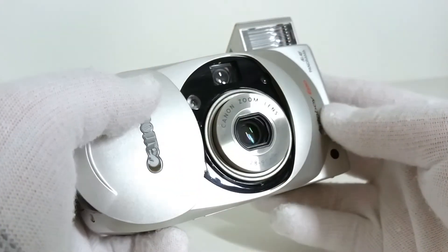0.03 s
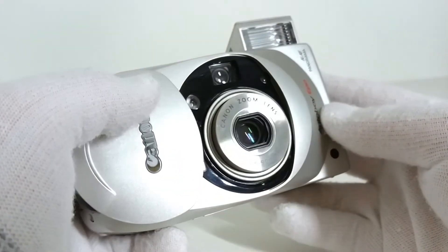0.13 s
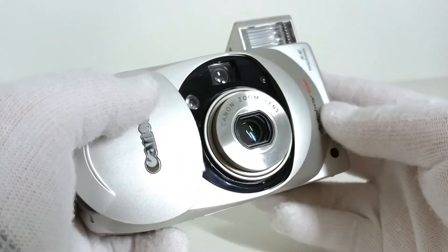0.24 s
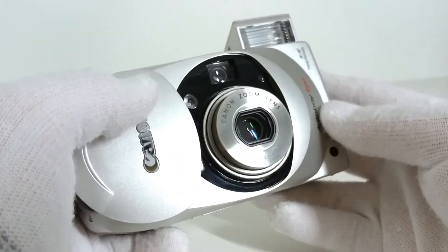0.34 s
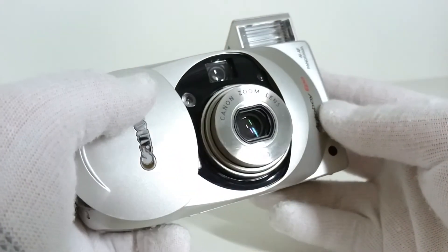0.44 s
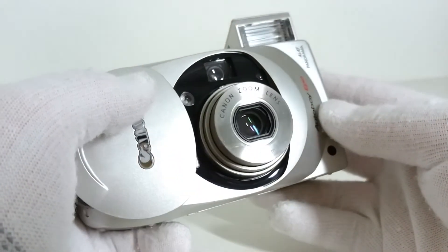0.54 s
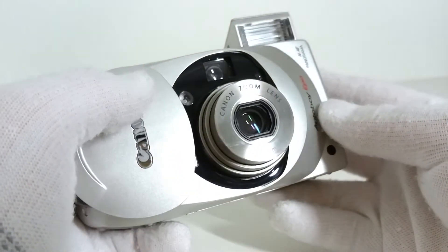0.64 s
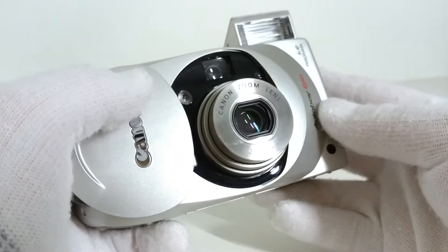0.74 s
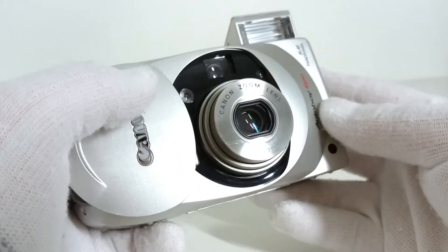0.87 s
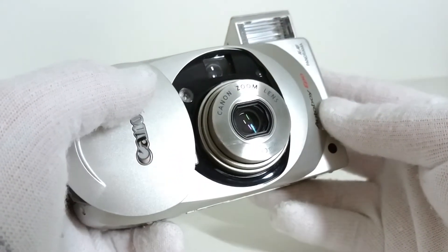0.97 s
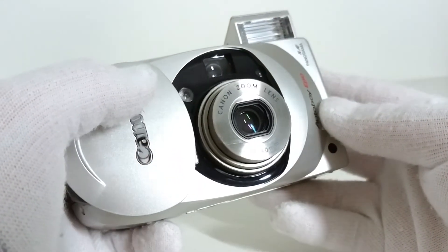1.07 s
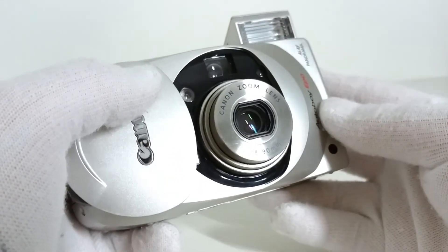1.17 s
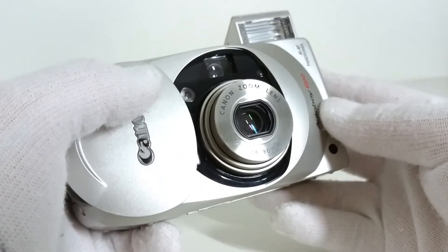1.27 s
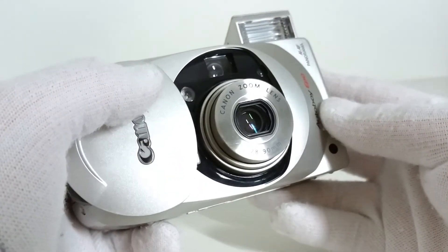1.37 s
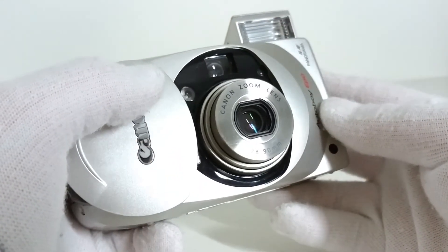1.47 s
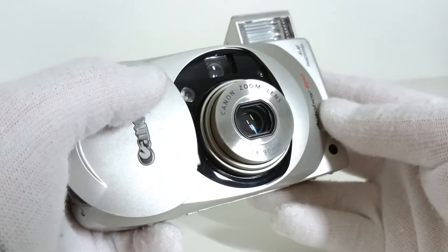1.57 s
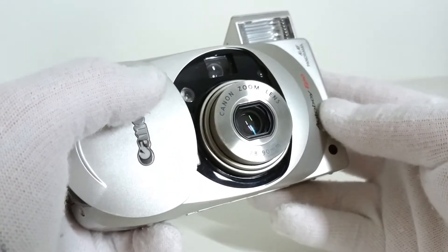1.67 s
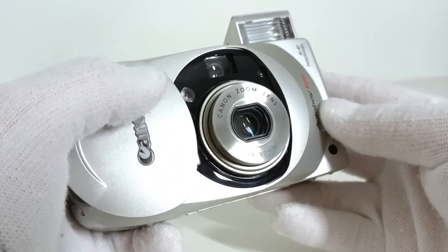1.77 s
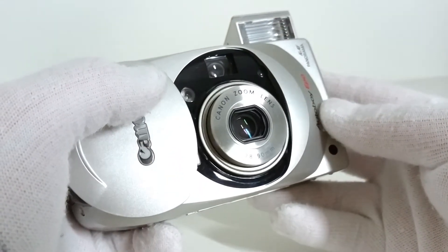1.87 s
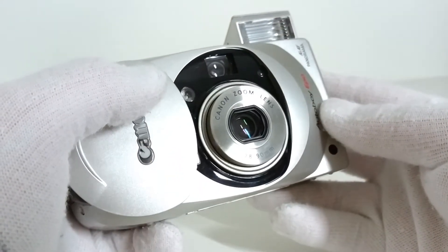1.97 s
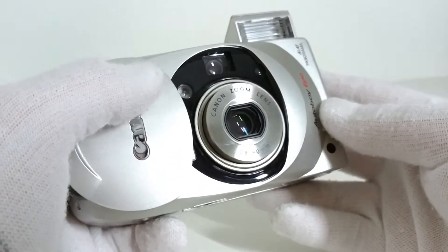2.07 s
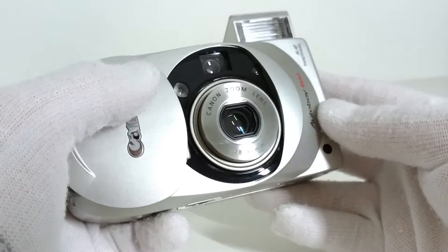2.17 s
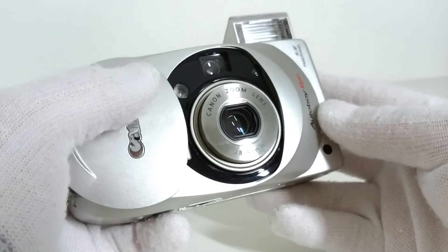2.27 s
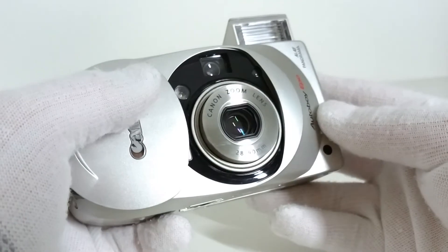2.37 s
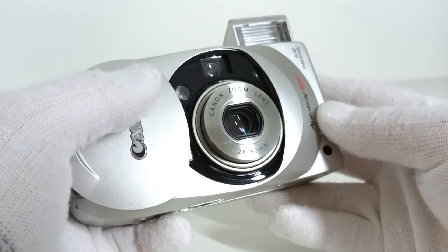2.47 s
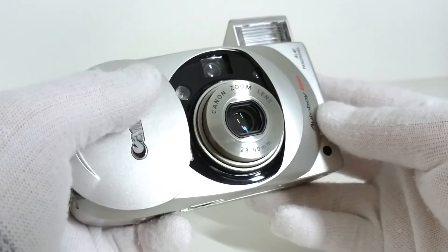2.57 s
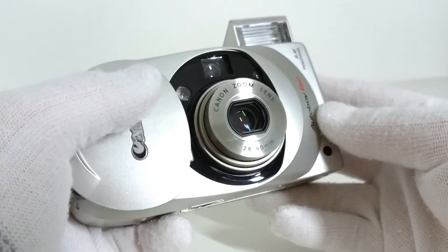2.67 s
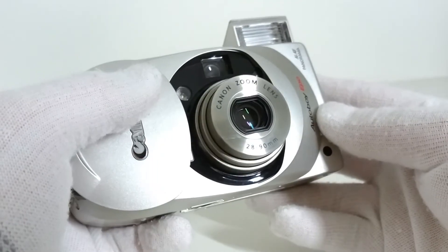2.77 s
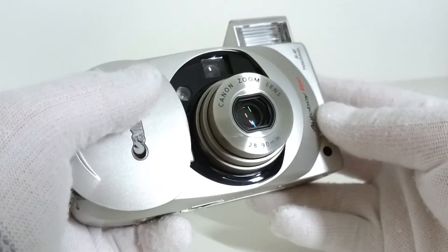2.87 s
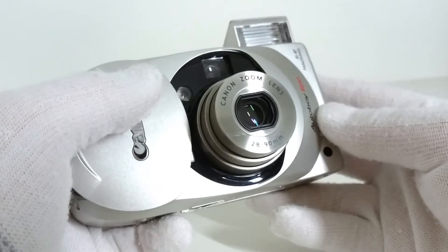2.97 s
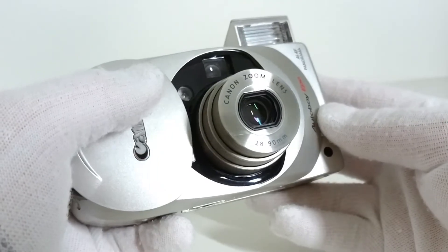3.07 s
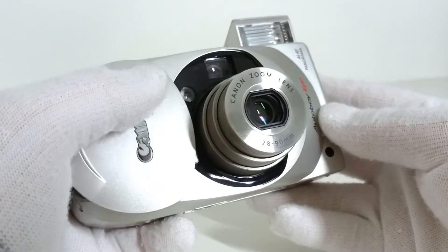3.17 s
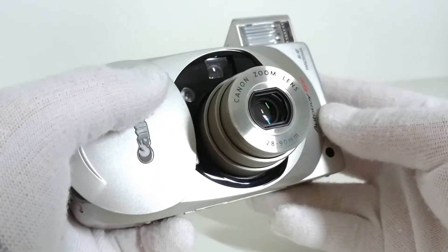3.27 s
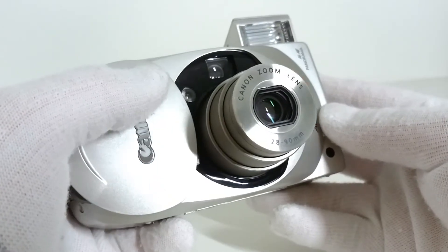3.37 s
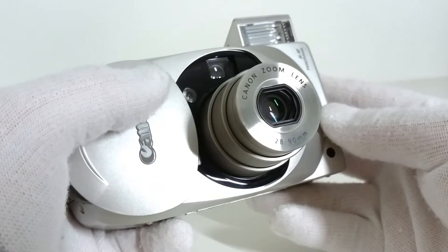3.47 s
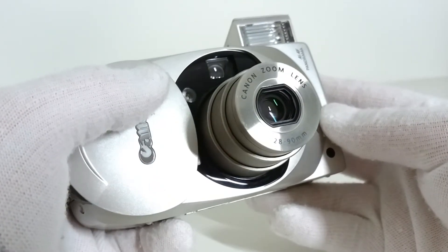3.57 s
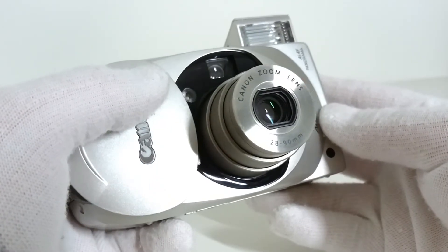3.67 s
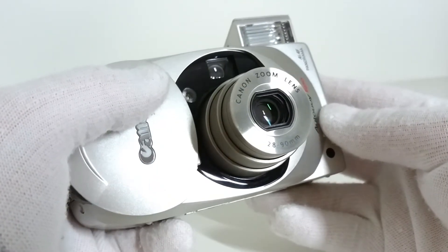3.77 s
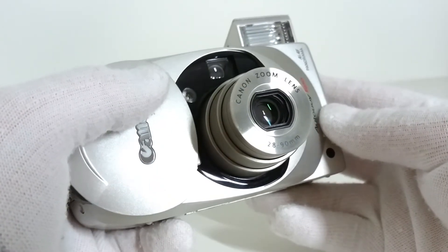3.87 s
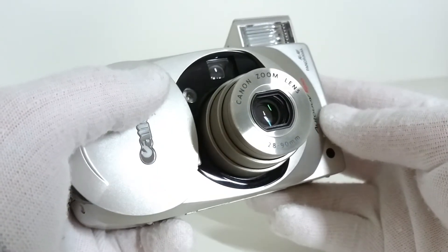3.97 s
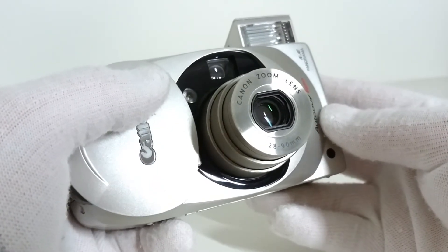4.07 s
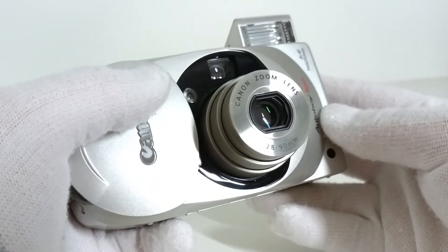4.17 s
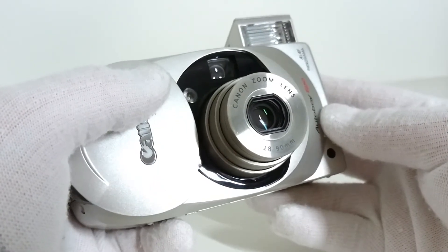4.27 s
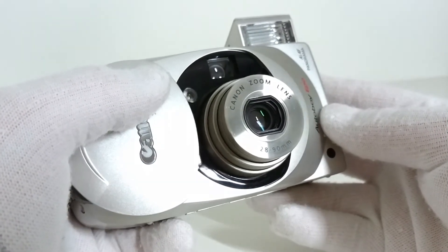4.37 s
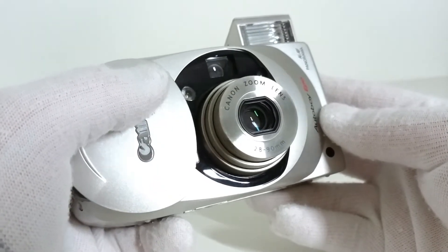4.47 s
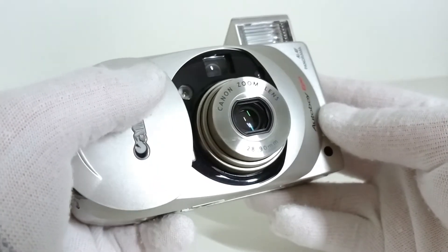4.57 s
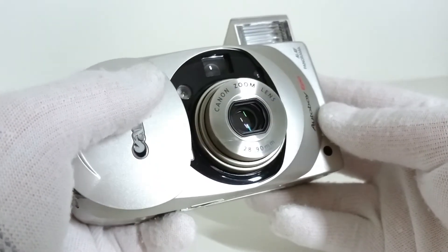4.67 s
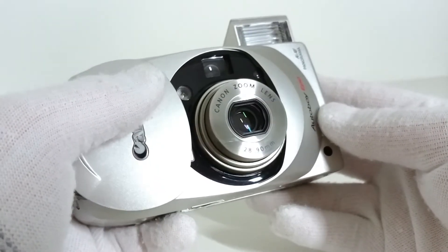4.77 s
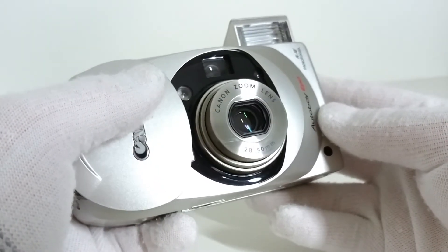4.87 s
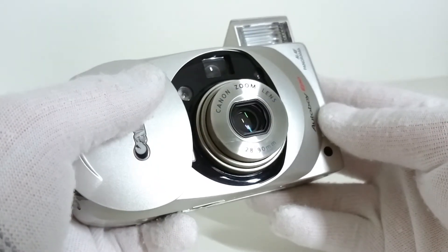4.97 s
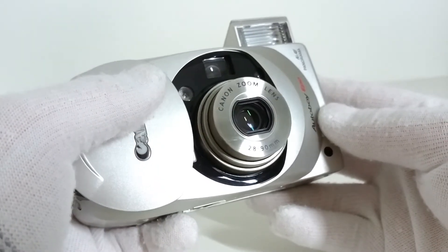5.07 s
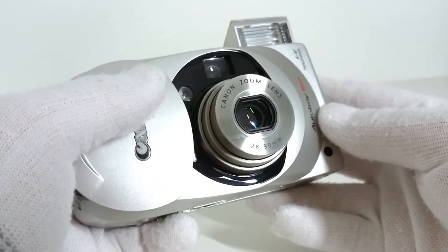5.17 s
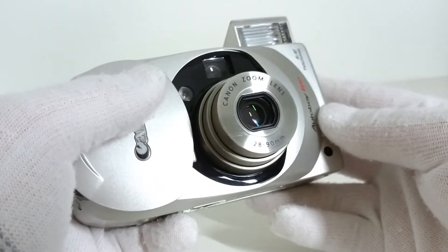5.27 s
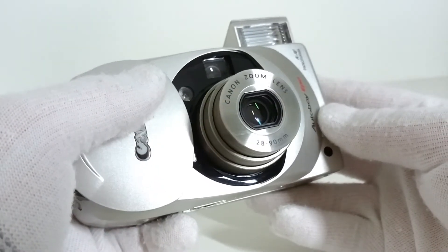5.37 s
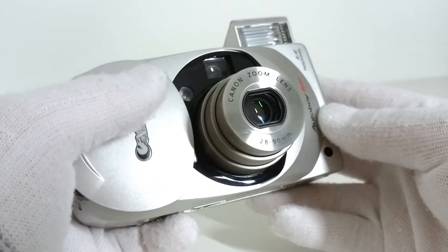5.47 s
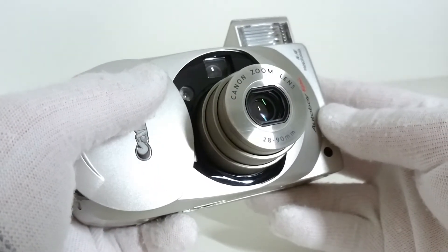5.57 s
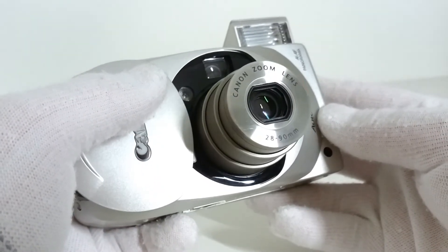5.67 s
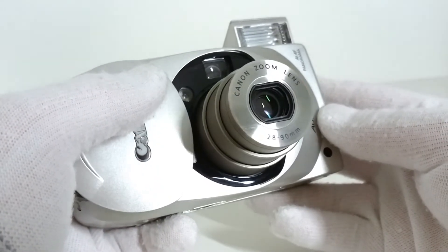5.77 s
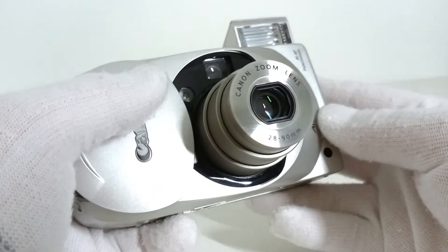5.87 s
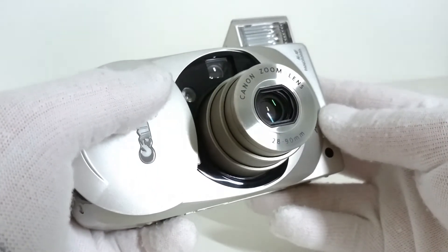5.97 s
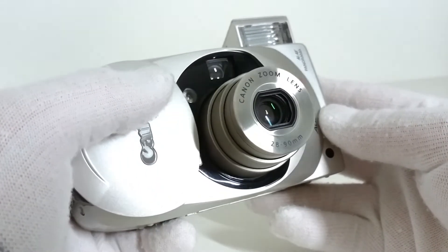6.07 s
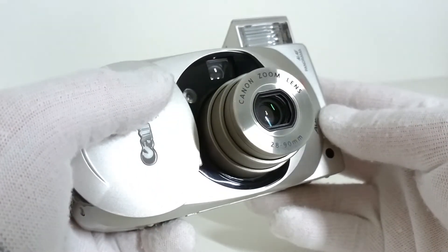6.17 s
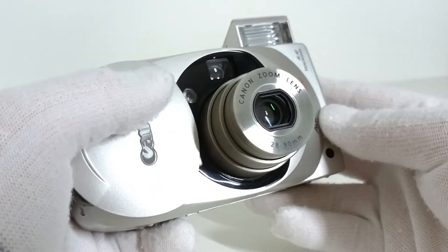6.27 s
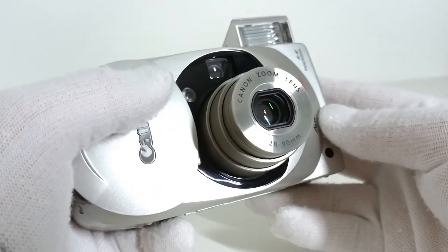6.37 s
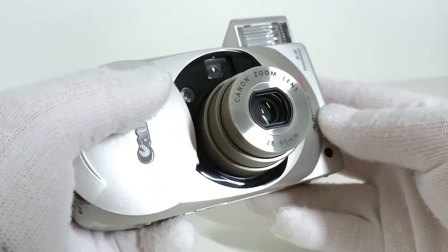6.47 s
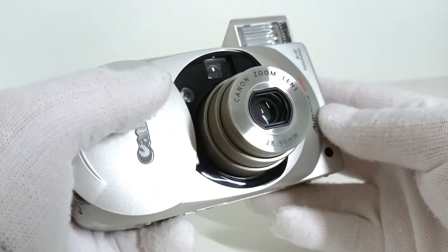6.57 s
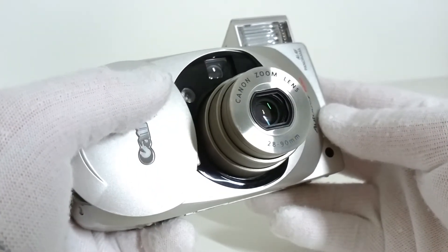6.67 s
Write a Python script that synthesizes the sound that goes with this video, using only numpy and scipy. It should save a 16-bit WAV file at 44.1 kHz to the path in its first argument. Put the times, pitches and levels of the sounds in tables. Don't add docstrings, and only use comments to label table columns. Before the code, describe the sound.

Very close, mono, in a small quiet furnished room with low unsteady rumble and faint air. A soft glove thump opens. From 0.2 to 0.7 s a tiny motor whines over hollow plastic gear rattle, its pitch sagging slightly under load. A short grainier return runs 0.8 to 1.03, stops with a sharp jolt, and a brief gear nudge follows at 1.2. Another return at 1.64 to 1.96 jolts, then nudges at 2.1. A bright click at 2.34 leads into the longest extension, 2.4 to 3.5, dipping around 3.1 and then rising. Returns follow at 3.6 to 3.84, with a nudge at 3.97, and 4.13 to 4.72, each ending in a jolt. The loudest hollow click comes at 4.8, with a nudge just after. The last extension whirs 5.03 to 5.8; the last return, 5.9 to 6.14, slams shut. A final nudge at 6.27 and small click at 6.4 leave quiet room tone. Dull finger thumps recur throughout.

```python
import sys
import numpy as np
from scipy import signal
from scipy.fft import rfft, irfft
from scipy.io import wavfile
from scipy.ndimage import uniform_filter1d

SR = 44100
rng = np.random.default_rng(int(sys.argv[2]) if len(sys.argv) > 2 else 0)


def gain_from_db(level_db):
    decades = np.asarray(level_db, float) / 20
    return 10 ** decades


def output_pcm(signal):
    pcm = np.clip(np.atleast_2d(signal).T, -1, 1) * 32767
    wavfile.write(sys.argv[1], SR, np.round(pcm).astype(np.int16))


N = 296352

# (time [s], shaft speed [Hz])
LOADS_OUT = [
    [(0.199, 418), (0.355, 435), (0.4, 375.7), (0.485, 333.4), (0.68, 347), (0.709, 314)],
    [(2.407, 422), (2.568, 446.5), (2.671, 394.3), (2.814, 385), (2.896, 354), (3.103, 309), (3.104, 370.7),
     (3.269, 375.2), (3.519, 422)],
    [(5.039, 427.4), (5.251, 425.3), (5.37, 390), (5.475, 378.4), (5.53, 394.5), (5.605, 388.6),
     (5.809, 432.3)],
]
# (time [s], shaft speed [Hz])
LOADS_BACK = [
    [(0.797, 391), (1.037, 450)],
    [(1.629, 382.6), (1.793, 432), (1.965, 443.5)],
    [(3.603, 439), (3.843, 442)],
    [(4.133, 399.7), (4.311, 415.8), (4.365, 437), (4.49, 427.4), (4.725, 432.5)],
    [(5.9, 424.9), (6.139, 447.5)],
]
# (sound start [s], switch-off [s], rattle level [dB])
POWER_OUT = [
    (0.195, 0.713, -44.5),
    (2.4, 3.515, -44),
    (5.031, 5.81, -44),
]
# (sound start [s], switch-off [s], rattle level [dB])
POWER_BACK = [
    (0.819, 1.025, -45.5),
    (1.639, 1.958, -46),
    (3.605, 3.834, -45.5),
    (4.132, 4.723, -46.5),
    (5.907, 6.132, -46),
]
# (multiple of shaft speed [-], level [dB])
ORDERS_OUT = [(1, -31.5), (2, -19), (3, 0), (4, -1), (5, -23), (6, -20.5), (7, -13), (8, -2.5), (9, -8.5),
              (10, -13.5), (11, -33), (12, -12.5), (13, -11.5), (14, -9.5), (15, -12.5), (16, -7.5),
              (17, -13), (18, -15), (19, -9)]
# (multiple of shaft speed [-], level [dB])
ORDERS_BACK = [(1, -9), (2, -7), (3, -5), (4, -17.5), (5, 6.5), (6, 0), (7, 0), (8, -2.5), (9, 1.5),
               (10, 4), (11, -1.5), (12, -1), (13, -1), (14, 5), (15, 0.5), (16, -31), (17, -37),
               (18, -24.5), (19, -0.5)]
# (multiple of shaft speed [-], level [dB])
PINION_OVERTONES = [(27, -13.5), (36, -18)]
# (multiple [-], base level [dB], resonance [Hz], width [Hz], level on it [dB])
MOUNT_OUT = [(2, -69, 790, 45, -61), (3, -47.5, 1200, 55, -44.5), (4, -66, 1550, 180, -46),
             (8, -58, 3130, 150, -46), (9, -58, 3160, 190, -42), (9, -75, 3800, 150, -52),
             (10, -60, 3370, 180, -43), (12, -62, 5020, 150, -53), (16, -63, 6250, 300, -54),
             (18, -65, 6300, 250, -52), (27, -70, 9500, 1000, -59), (36, -76, 12100, 700, -67)]
# (multiple [-], base level [dB], resonance [Hz], width [Hz], level on it [dB])
MOUNT_BACK = [(3, -54, 1165, 50, -68), (5, -69, 2170, 90, -53), (7, -63, 3020, 120, -57),
              (9, -65, 3150, 200, -54)]
# (frequency [Hz], density [dB per Hz])
GEARS_OUT = [(240, -65), (400, -20), (921, -8.5), (1070, -20), (1230, -18), (1400, -14.5), (1650, -10.5),
             (2150, -14.5), (3070, -1.5), (3870, -6), (4730, -7), (6540, -6), (12300, -27.5), (15000, -15),
             (15800, -24)]
# (frequency [Hz], density [dB per Hz])
GEARS_BACK = [(240, -57), (400, -15.5), (1070, -8), (1230, -5), (1350, -6), (1580, 0.5), (1900, -9.5),
              (2120, -4.5), (2840, -7), (3120, 3), (3640, -6), (6440, -2), (11400, -18.5), (15000, -8),
              (15800, -13.5)]
# (frequency [Hz], density [dB per Hz])
GEARS_SLACK = [(290, -24), (500, -4), (621, -11), (1000, -1), (1360, -10), (1570, -3.5), (2610, -10),
               (3250, -2.5), (4210, -12), (6510, -6.5), (11600, -29), (13800, -15.5), (16000, -22.5)]
# (frequency [Hz], width [Hz], boost [dB])
SHELL_MODES = [(1585, 202, 19.5), (3260, 26, 18.5), (3365, 22, 15), (3640, 210, 8), (5700, 400, 9),
               (6560, 330, 5), (9780, 640, 16.5)]
# (time [s], rattle level [dB], t60 [s])
NUDGES = [
    (1.168, -40.5, 0.19),
    (2.095, -41, 0.21),
    (3.971, -41, 0.2),
    (4.856, -39.5, 0.19),
    (6.272, -40, 0.19),
]
# (time [s], peak level [dB], t60 [s])
JOLTS = [
    (1.033, -21, 0.069),
    (1.96, -22.5, 0.084),
    (3.837, -21, 0.07),
    (4.72, -21, 0.06),
    (6.138, -19.5, 0.062),
]
# (time [s], peak level [dB], ring [Hz], t60 [s], bright tick level [dB])
CLICKS = [
    (0.447, -36, 675, 0.03, -51),
    (1.42, -50, 570, 0.036, -69),
    (2.062, -37, 655, 0.026, -75),
    (2.339, -30, 677, 0.023, -34),
    (2.71, -39, 657, 0.019, -70),
    (3.109, -36, 650, 0.045, -54),
    (4.8, -28.5, 703, 0.022, -36),
    (5.643, -38.5, 740, 0.065, -54.5),
    (6.41, -39, 597, 0.03, -60),
]
# (time [s], peak level [dB])
TICKS = [
    (.168, -54),
    (1.6167, -51),
    (2.381, -49),
    (4.111, -42),
    (4.7544, -73),
    (5.012, -47),
]
# (time [s], peak level [dB], ring [Hz], t60 [s])
THUMPS = [(0.003, -36.5, 188, 0.078), (0.214, -38, 90, 0.04), (0.799, -30, 171, 0.07),
          (1.734, -42, 91.5, 0.12), (2.066, -35, 111, 0.052), (2.189, -40.5, 151, 0.11),
          (2.803, -36, 160, 0.04), (3.097, -39, 174, 0.075), (3.684, -38, 145, 0.15),
          (4.206, -38.5, 183.4, 0.15), (4.81, -45, 138.5, 0.074), (5.156, -37.5, 122, 0.091),
          (5.66, -46, 164, 0.11)]
# (frequency [Hz], density [dB per Hz])
BASS = [(15, -54), (25, -16), (48, -0.5), (146, 1.5), (195, -2.5), (232, -7.5), (400, -25), (520, -54),
        (880, -120)]
# (frequency [Hz], density [dB per Hz])
AIR = [(200, -29.5), (300, -8.5), (450, -12), (800, -10), (1200, -18), (2000, -23), (3500, -29.5),
       (5000, -43), (9000, -45), (12500, -43), (16000, -52)]
# (time [s], half length [s], swell [dB])
GRIP = [(0, 0.14, 7.5), (.13, 0.098, -7), (.25, 0.091, 7), (1.7, 1, 4), (2.9, 0.19, 4), (3.72, 0.18, 8),
        (4.21, 0.058, 6.5), (4.48, 0.15, 9.5), (5.16, 0.21, 5.5), (5.68, 0.032, 1), (6.42, .04, 3)]
# (time [s], half length [s], swell [dB])
REST = [
    (.15, 0.1, -6.5),
    (1.53, 0.12, -7.5),
    (3.9, 0.14, -1),
    (6.68, 0.18, -6),
]

OUT_REF_HZ, BACK_REF_HZ, FREE_HZ = 430, 436, 408
INERTIA_S, COAST_S = 0.045, 0.09
ATTACK_S, HANG_S, RELEASE_DB_PER_S, LET_GO_DB = 0.014, 0.017, 700, -6
KICK_S, KICK_HALF_S, NUDGE_ATTACK_S = 0.036, 0.028, 0.018
WOBBLE_DB, PATCHY_DB = 0.8, 2
FINE_ORDERS = [(k, -9.5) for k in range(20, 36) if k != 27]
LEVEL_STEP = 32
ROOM_T60_S, ROOM_DB = 0.26, -16
RUMBLE_DB, AIR_DB = -58, -62.5
MIC_TOP_HZ = 15800


def drive(loads, power, orders, ref_hz, mounts, noise, slack, whine_db, speed_share, load_db, kick_db, jitter):
    out, wobble, chatter = np.zeros(N), walk(45, count=9), walk(400, count=8)
    bright = butter(noise, 2, 7500, "high")
    dull = butter(slack, 2, 2400)
    strong = [row[0] for row in mounts]
    for load, (on_s, off_s, rattle_db) in zip(loads, power):
        i = np.arange(int(load[0][0] * SR), int((off_s + 0.1) * SR))
        coarse = i[::LEVEL_STEP]
        t = i / SR
        hz = spin(load, off_s, t)
        turn = 2 * np.pi * np.cumsum(hz * (1 + jitter * wobble[8, i])) / SR
        fade_db = -RELEASE_DB_PER_S * np.maximum(t - off_s - HANG_S, 0)

        db = rattle_db + fade_db + speed_share * 20 * np.log10(hz / FREE_HZ + 0.059)
        db += load_db * (1 - np.interp(t, *np.transpose(load)) / FREE_HZ)
        x = gain_from_db(db) * (1 + 0.071 * np.cos(turn))
        x *= noise[i] - np.clip((330 - hz) / 200, 0, 0.8) * bright[i]
        x += gain_from_db(kick_db) * np.exp(-((t - on_s - KICK_S) / KICK_HALF_S) ** 2) * dull[i]

        loose_db = uniform_filter1d(abs(np.gradient(hz, 1 / SR)), 400) / 200
        slow_db = np.maximum(280 - hz, 0) / 4
        let_go_db = LET_GO_DB * np.clip((t - off_s) / 0.008, 0, 1)
        for k, order_db in orders[1:]:
            if k in strong:
                level_db = mount_db(mounts, k, hz) + fade_db + let_go_db - slow_db
                level_db -= 1.2 * np.maximum(loose_db - 250 / k ** 2, 0)
                level_db = level_db[::LEVEL_STEP] + 3
            else:
                level_db = (db - loose_db)[::LEVEL_STEP] + whine_db + order_db
                level_db += shell_db(k * hz[::LEVEL_STEP]) - shell_db(k * ref_hz)
                level_db += PATCHY_DB * wobble[int(3 * k) % 8, (coarse + SR) % N]
            level_db += WOBBLE_DB * wobble[int(k) % 8, coarse]
            gain = np.repeat(gain_from_db(level_db), LEVEL_STEP)[:len(i)]
            gain *= 1 + (0.15 if k in strong else 0.45) * chatter[int(k) % 8, i]
            x += gain * np.sin(k * turn + rng.uniform(0, 2 * np.pi))
        out[i] += x * np.clip((t - on_s) / ATTACK_S, 0, 1)
    return out


def spin(load, off_s, t):
    a = 1 / (INERTIA_S * SR)
    hz = signal.lfilter([a], [1, a - 1], np.interp(t, *np.transpose(load)))
    held = np.minimum.accumulate(np.where(t > off_s, hz, np.inf)).clip(0, hz)
    return held * np.exp(-np.maximum(t - off_s, 0) / COAST_S)


def mount_db(mounts, k, hz):
    total = 0
    for multiple, base_db, peak_hz, width_hz, peak_db in mounts:
        if multiple == k:
            bell = np.exp(-((k * hz - peak_hz) / width_hz) ** 2)
            total = total + gain_from_db(base_db + (peak_db - base_db) * bell)
    return 20 * np.log10(total)


def shell_db(hz):
    power = 1
    for mode_hz, width_hz, db in SHELL_MODES:
        power = power + (gain_from_db(db) ** 2 - 1) / (1 + (2 * (hz - mode_hz) / width_hz) ** 2)
    return 10 * np.log10(power)


def rattle(gears, grit_db, share, flicker_db, ring_share):
    knocks = (rng.random(N) < share) * gain_from_db(grit_db * np.minimum(rng.exponential(size=N), 3))
    x = rng.standard_normal(N) * (1 + knocks)
    flicker = gain_from_db(flicker_db * walk(60, count=4))
    low, mid = butter(x, 1, 2500), butter(x, 1, 7500)
    x = flicker[0] * (low * flicker[1] + (mid - low) * flicker[2] + (x - mid) * flicker[3])
    return colour(x, lambda hz: at(gears, hz) + ring_share * shell_db(hz), 2500, 8000)


def jolts(noise):
    out, t = np.zeros(N), seconds(0.1)
    for s, db, t60 in JOLTS:
        burst = noise[int(s * SR) - SR // 2:][:len(t)] * gain_from_db(-60 * t / t60 - 9.5)
        burst *= 1 - np.exp(-(t / 0.0051) ** 2)
        modes = gain_from_db(-10) * ring(1510, 0.039, 0.0014) + gain_from_db(-18) * ring(1000, 0.072, 0.0091)
        add(out, s, gain_from_db(db) * burst)
        add(out, s, gain_from_db(db) * modes)
    return out


def nudges(noise):
    gain, t = np.zeros(N), seconds(0.15)
    for s, db, t60 in NUDGES:
        add(gain, s, gain_from_db(db - 60 * t / t60) * (1 - np.exp(-(t / NUDGE_ATTACK_S) ** 2)))
    return gain * noise


def clicks(noise):
    out, t = np.zeros(N), seconds(0.03)
    for s, db, hz, t60, tick_db in CLICKS:
        knock = ring(hz, t60, 0.0002) + 0.12 * ring(1.45 * hz, 0.081, 0.003)
        add(out, s, gain_from_db(db) * knock)
        tick = noise[int(s * SR):][:len(t)] * gain_from_db(-60 * t / 0.032 - 11)
        tick += 1.8 * ring(1700, 0.008, 0.0003)[:len(t)]
        add(out, s, gain_from_db(tick_db) * tick)
    thin = butter(noise, 4, 4300, "high")
    for s, db in TICKS:
        envelope = gain_from_db(-60 * t / 0.036) * (1 - np.exp(-t / 0.001))
        add(out, s, gain_from_db(db - 11) * thin[int(s * SR):][:len(t)] * envelope)
    return out


def hands():
    out = np.zeros(N)
    for s, db, hz, t60 in THUMPS:
        add(out, s, gain_from_db(db) * ring(hz, t60, 0.0012))
    return out


def room(x):
    t = seconds(0.8)
    echoes = rng.standard_normal(len(t)) * gain_from_db(-60 * t / ROOM_T60_S) * (t > 0.004)
    echoes = signal.lfilter([1], [1, -0.15], echoes) * (1 + 2 * gain_from_db(-60 * t / 0.22))
    return x + gain_from_db(ROOM_DB) * signal.fftconvolve(x, echoes / np.linalg.norm(echoes))[:N]


def rumble():
    low = colour(rng.standard_normal(N), lambda hz: at(BASS, hz), 40, 300)
    air = colour(rng.standard_normal(N), lambda hz: at(AIR, hz), 500, 4000)
    low_db = RUMBLE_DB + bells(GRIP) + 2.44 * walk(15)[0]
    air_db = AIR_DB + bells(REST) + walk(22.03)[0]
    return gain_from_db(low_db) * low + gain_from_db(air_db) * air


def ring(hz, t60, soft_s):
    t = seconds(0.15)
    return np.sin(2 * np.pi * hz * t) * gain_from_db(-60 * t / t60) * (1 - np.exp(-t / soft_s))


def walk(rate_hz, count=1):
    k = int(SR / rate_hz)
    held = np.repeat(rng.standard_normal((count, N // k + 1)), k, axis=1)
    return 1.35 * uniform_filter1d(uniform_filter1d(held, k), k)[:, :N]


def bells(rows):
    return sum(db * np.exp(-((np.arange(N) / SR - s) / half_s) ** 2) for s, half_s, db in rows)


def colour(x, db_of, lo_hz, hi_hz):
    hz = np.fft.rfftfreq(len(x), 1 / SR)
    z = rfft(x) * gain_from_db(db_of(hz))
    band = z[(hz > lo_hz) & (hz < hi_hz)]
    return irfft(z, len(x)) * len(x) / np.sqrt(2 * np.sum(abs(band) ** 2))


def at(table, hz):
    f, db = np.transpose(table)
    return np.interp(np.log(np.maximum(hz, 1)), np.log(f), db)


def butter(x, order, hz, kind="low"):
    return signal.sosfilt(signal.butter(order, hz, kind, fs=SR, output="sos"), x)


def seconds(length_s):
    return np.arange(int(length_s * SR)) / SR


def add(out, s, x):
    i = max(int(s * SR), 0)
    out[i:i + len(x)] += x[:N - i]


def scene():
    pushing = rattle(GEARS_OUT, grit_db=0.5, share=0.018, flicker_db=1.4, ring_share=0.41)
    pulling = rattle(GEARS_BACK, grit_db=-1.5, share=0.017, flicker_db=1.16, ring_share=0.047)
    slack = rattle(GEARS_SLACK, grit_db=2.5, share=0.03, flicker_db=0.7, ring_share=0.15)
    orders_out = ORDERS_OUT + PINION_OVERTONES + [(k, db - 17) for k, db in FINE_ORDERS]
    orders_back = ORDERS_BACK + [(k, db - 3.5) for k, db in FINE_ORDERS]
    extending = drive(LOADS_OUT, POWER_OUT, orders_out, OUT_REF_HZ, MOUNT_OUT, pushing, slack,
                      whine_db=-1.5, speed_share=0.77, load_db=10, kick_db=-46.5, jitter=0.001)
    returning = drive(LOADS_BACK, POWER_BACK, orders_back, BACK_REF_HZ, MOUNT_BACK, pulling, slack,
                      whine_db=-12.5, speed_share=0.54, load_db=0.5, kick_db=-48, jitter=0.0013)
    stops = jolts(0.76 * pushing + 0.6 * slack) + nudges(slack)
    mono = room(extending + returning + stops + clicks(pulling)) + hands() + rumble()
    return np.array([mono, mono])


def band_limit(x):
    return signal.sosfilt(signal.butter(12, 16400, fs=SR, output="sos"), x)


def record(dry):
    mix = signal.sosfilt(signal.ellip(16, 0.3, 60, MIC_TOP_HZ, fs=SR, output="sos"), dry)
    return band_limit(mix)


dry = scene()
out = record(dry)
output_pcm(out)
```